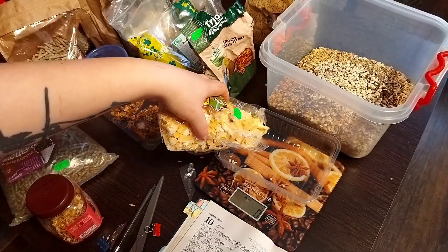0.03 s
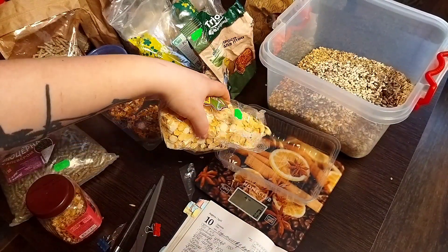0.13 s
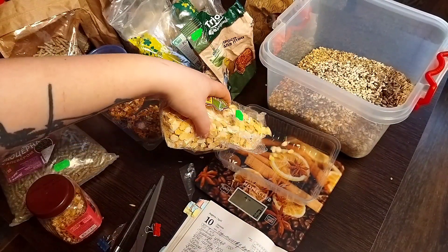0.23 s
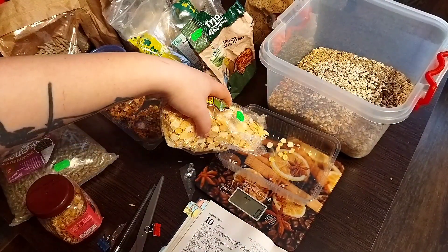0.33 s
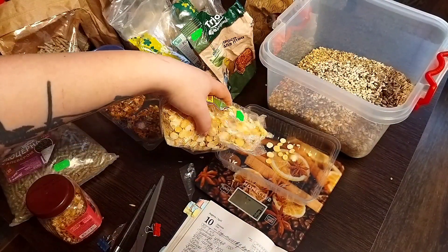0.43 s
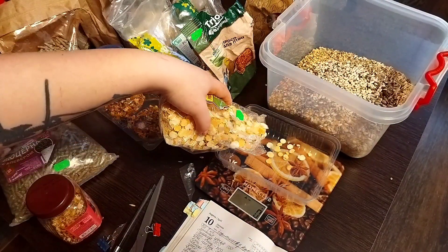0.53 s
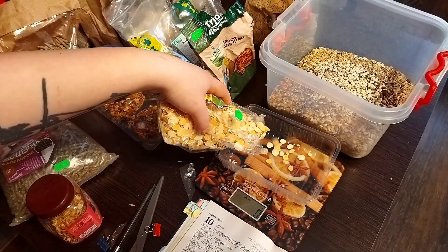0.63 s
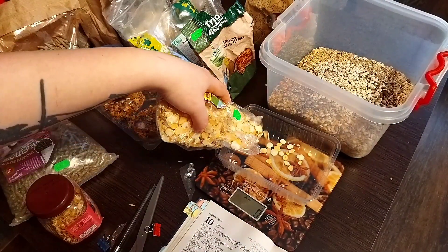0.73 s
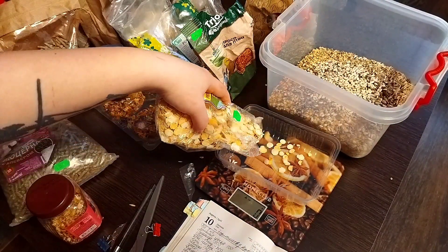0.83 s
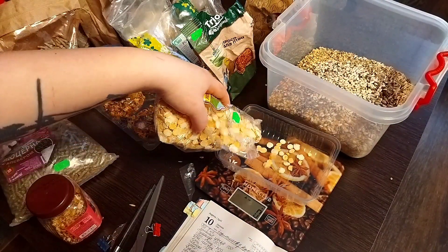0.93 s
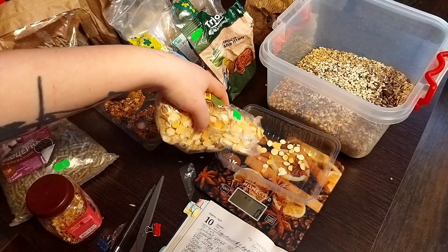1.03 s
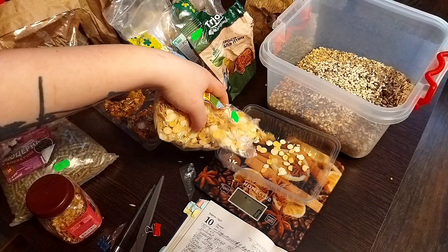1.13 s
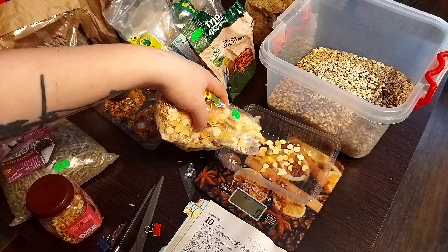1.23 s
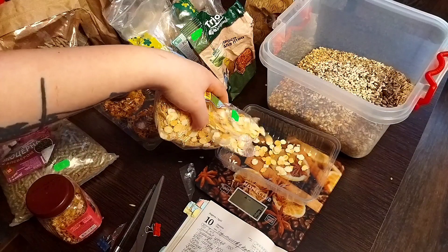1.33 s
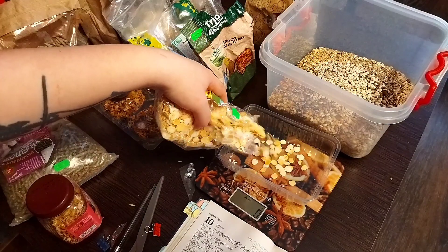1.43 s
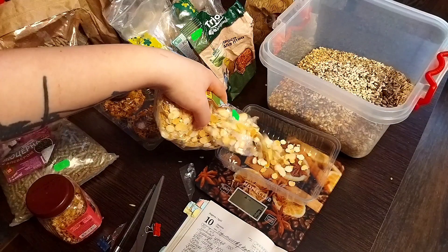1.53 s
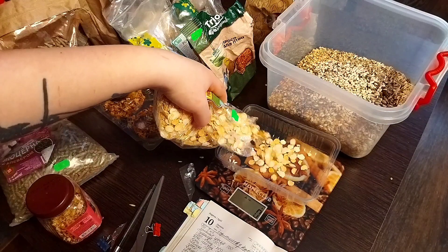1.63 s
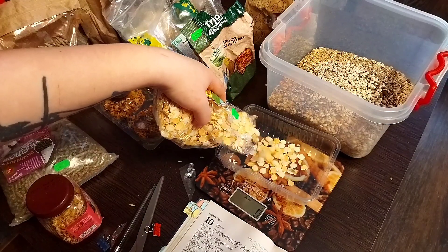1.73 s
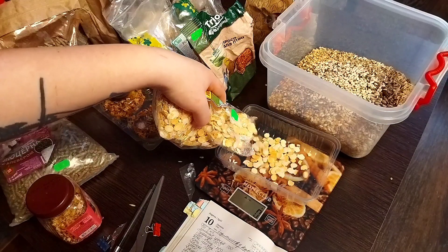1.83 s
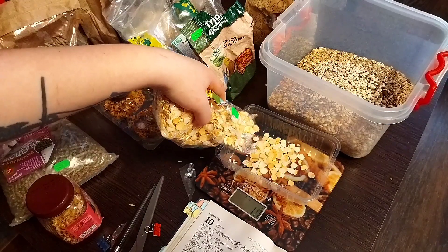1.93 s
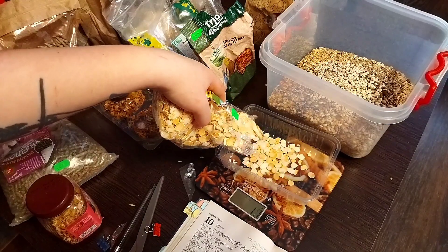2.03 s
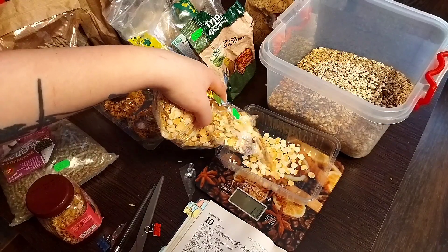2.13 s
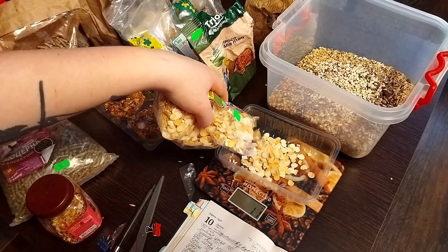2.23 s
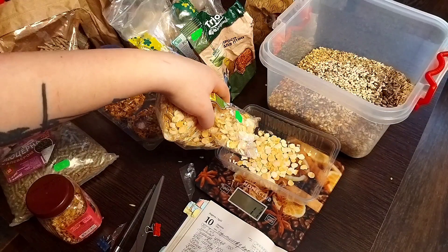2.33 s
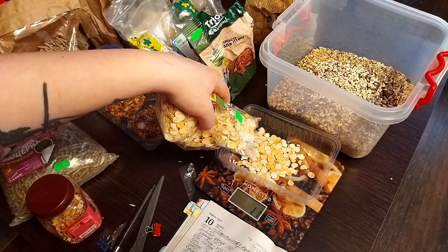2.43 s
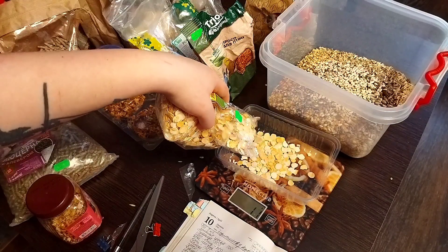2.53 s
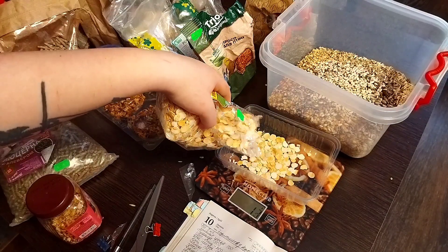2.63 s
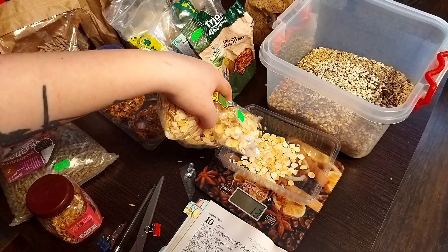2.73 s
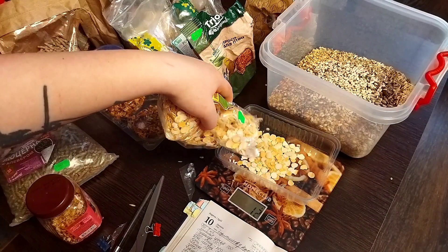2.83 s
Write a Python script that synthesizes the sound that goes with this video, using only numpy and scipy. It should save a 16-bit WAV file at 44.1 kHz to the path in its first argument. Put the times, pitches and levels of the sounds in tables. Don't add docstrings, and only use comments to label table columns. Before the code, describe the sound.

Dry flakes pour from a plastic bag into a thin plastic tray, starting with sharp separate ticks, thickening into crackling bursts, then thinning out; close stereo microphone in a quiet furnished room.

```python
import sys
import numpy as np
from scipy import signal
from scipy.fft import rfft, irfft
from scipy.io import wavfile

SR = 44100
rng = np.random.default_rng(int(sys.argv[2]) if len(sys.argv) > 2 else 0)


def transcribe(u):
    v = np.clip(np.atleast_2d(u).T, -1, 1)
    q = np.round(v * 32767).astype(np.int16)
    wavfile.write(sys.argv[1], SR, q)


def to_linear_factor(level_db):
    exponent = np.asarray(level_db, float) / 20
    return 10 ** exponent


N = 127890
LEFT_RIGHT = np.array([[1], [-1]])


def two_ports(mid, side, alike):
    return np.sqrt(1 + alike) * mid + np.sqrt(1 - alike) * side * LEFT_RIGHT


# pitch_hz [Hz], width_hz [Hz], level_db [dB], left_over_right_db [dB]
TRAY = [(310, 410, -22.5, 1), (486, 44, -16.5, 15), (784, 113, -5, -3.5), (1306, 440, -5, 1),
        (1649, 135, -3, 9.5), (2248, 550, 0.5, 2.8), (3310, 950, 1.16, 0.5), (4326, 746, 5, 0),
        (6400, 890, -1, -0.5), (8950, 1640, 0, 6), (11800, 2170, -3.5, -4), (14700, 1300, -15.5, 22)]
# pitch_hz [Hz], share [0-1]
TRAY_LIKENESS = [(350, .97), (700, .6), (4000, .7), (8000, .15)]
CRUNCH_S, CRUNCH_LONGER_LOW = 0.0005, 0.35
TICK_DB, TICK_S = 7, 0.00006
SINGLE_SCATTER_DB, SMALL_SCATTER_DB = 2, 5.5
SMALL_PEAK_HZ, SMALL_PEAK_OCTAVES, SMALL_PEAK_DB = 3830, 0.57, 3


def flakes():
    start_s, flake_db, tilt, small = landings()
    at = np.clip((start_s * SR).astype(int), 0, N - 1)
    scatter_db = np.where(small, SMALL_SCATTER_DB, SINGLE_SCATTER_DB)
    scatter = rng.standard_normal((len(at), len(TRAY)))
    white = rng.standard_normal((2, 2, N))
    out = np.zeros((2, N))
    for k, (hz, width_hz, level_db, pan_db) in enumerate(TRAY):
        octave = max(np.log2(hz / 3000), -1.9)
        peak = np.exp(-(np.log2(hz / SMALL_PEAK_HZ) / SMALL_PEAK_OCTAVES) ** 2)
        mode_db = level_db + small * SMALL_PEAK_DB * peak
        own_db = scatter_db * np.clip(scatter[:, k], -3, 1.4)
        power = np.bincount(at, to_linear_factor(2 * (flake_db + mode_db + tilt * octave + own_db)), N) + 1e-18

        tick = to_linear_factor(2 * TICK_DB) * signal.lfilter([1], [1, -np.exp(-1 / (TICK_S * SR))], power)
        tau = CRUNCH_S * (3000 / hz) ** CRUNCH_LONGER_LOW * SR
        decay = np.exp(-1 / tau)
        swell = signal.lfilter([np.e / tau], [1, -2 * decay, decay * decay], power)
        crunch = np.sqrt(tick + swell)

        alike = np.clip(np.interp(hz, *np.transpose(TRAY_LIKENESS)), 0, 1)
        mid, side = white[k % 2]
        drive = crunch * two_ports(mid, side, alike) * to_linear_factor(pan_db / 2 * LEFT_RIGHT)
        r = np.exp(-np.pi * width_hz / SR)
        feed = (1 - r * r) / 2 * np.array([1, 0, -1])
        out += signal.lfilter(feed, [1, -2 * r * np.cos(2 * np.pi * hz / SR), r * r], drive)
    return out


# [dB per octave, brightness]
SINGLES = [(0.157, -29.5, -1.5), (0.219, -9.5, -2.5), (0.232, -16.5, 0), (0.247, -11.5, -0.2),
           (0.263, -19, 2), (0.271, -9, 1.7), (0.276, -9, 1), (0.281, -5.5, -4), (0.284, -10, 3),
           (0.315, -6.5, -0.5), (0.336, -10, 2), (0.338, -10.5, -1), (0.354, -15, -0.5), (0.411, -16, 1),
           (0.425, -5.5, -3.5), (0.442, -11, 6), (0.513, -13.5, -2.1), (0.521, -19, 0), (0.552, -14, 2.7),
           (0.581, -19.5, 0), (0.627, -13, 0.5), (0.659, -15, -4.5), (0.682, -10.5, 1.5), (0.739, -17, 0.8),
           (0.777, -9, -3), (0.842, -18.5, 0.5), (0.858, -10.5, -1.5), (0.868, -17, 4.5), (0.884, -7.5, 3),
           (0.895, -8, 0.1),
           (0.952, -18, -1.5), (0.966, -8.5, -1), (1.003, -10.5, -3.5), (1.018, -8.5, 1), (1.023, -10, -4),
          (1.109, -17, 1.5), (1.243, -12, -0.8), (1.255, -9.5, -1.7), (1.279, -10, 0), (1.288, -7.5, 1),
          (1.295, -6, -0.5), (1.302, -5.5, -0.5), (1.344, -22, -5), (1.454, -9, -1.5), (1.489, -11, 5.5),
          (1.501, -14.5, -2.5), (1.549, -9.5, -1), (1.553, -16.5, 4.5), (1.565, -15, 0.5),
          (1.582, -11.5, -1.5), (1.614, -13.5, 1.5), (1.618, -22, 2.5), (1.656, -7, -1.5), (1.703, -7, -2),
          (1.711, -11, -1.5), (1.744, -10, -1), (1.765, -22, 2.5),
           (1.909, -12.5, -0.8), (1.918, -25, 4), (1.943, -12.5, -2), (1.966, -28, 8), (2.026, -8.5, -1.5),
        (2.067, -12, 2), (2.098, -27, 3), (2.115, -10.5, -2.5), (2.124, -16.5, 2.5), (2.169, -21, -0.5),
        (2.229, -14, -0.5), (2.314, -16, 2.5), (2.365, -14.5, 2), (2.37, -10, -4), (2.503, -24.5, 2.5),
        (2.515, -14.5, 0), (2.602, -22, 3), (2.606, -15.5, 0.7), (2.708, -23, -4.5), (2.733, -20, 0.5),
        (2.795, -29.5, 5), (2.866, -24.5, 4.5),
           (0.293, -16.5, -4), (0.329, -12, -2), (0.372, -20.5, 2), (0.388, -24, -2), (0.432, -21, 0.4),
        (0.449, -15.5, -3), (0.503, -22, -3), (0.518, -19.5, -3.5), (0.532, -23, -5), (0.549, -20, 2.5),
        (0.632, -22, 2), (0.663, -20, 5), (0.748, -17.5, 0), (0.759, -20.5, 2.7), (0.813, -30, -2),
        (0.999, -15.5, 2.7), (1.051, -30, 5), (1.1, -27, -7), (1.144, -22.5, 0.5), (1.173, -24.5, 1.5),
        (1.216, -27, -3), (1.269, -23, 2), (1.313, -20, -2), (1.323, -13, -2), (1.332, -19, 4),
        (1.336, -12, -3), (1.364, -18, -2), (1.384, -18.5, -5.5), (1.462, -21.5, -3), (1.495, -14, 0),
        (1.509, -16, -5), (1.521, -18, -2), (1.561, -20, 2), (1.608, -16, 0), (1.638, -13.5, -3.5),
        (1.646, -22, 6), (1.65, -15, 3), (1.661, -15.5, 4), (1.667, -18, 4), (1.675, -12, -2),
        (1.682, -27, 2.7), (1.689, -16, 4.0), (1.722, -18, 1.0), (1.782, -31, 3), (1.793, -17.5, -2.5),
        (1.808, -18, -3), (1.818, -23, 3), (1.866, -22, 4), (1.936, -20, 4.5), (1.991, -19.5, -4),
        (2.018, -21, -1), (2.181, -28, -2), (2.21, -42, -7), (2.238, -20.5, 3.5), (2.241, -21, 6.5),
        (2.27, -20, 3.5), (2.302, -18, -2), (2.353, -29, 5), (2.416, -22.5, 1), (2.486, -31, 1)]
FLAKE_DB, FLIGHT_S = -8, 0.001
REBOUND_S, REBOUND_DB, REBOUND_DULLER_DB = 0.0025, -11, 2.5
SMALL_PER_S, SMALL_DB, SMALL_TILT_DB = 1540, -14.5, 0.15
SIZE_SPREAD_DB, SIZE_CAP = 3.5, 2.88


def landings():
    s, db, tilt = np.transpose(SINGLES)
    s = np.r_[s, s + REBOUND_S] + FLIGHT_S
    db = np.r_[db, db + REBOUND_DB] + FLAKE_DB
    tilt = np.r_[tilt, tilt - REBOUND_DULLER_DB]

    when, chance, size, hue = rng.random((4, 9000))
    when *= N / SR
    size_db = SIZE_SPREAD_DB * np.minimum(-np.log(size + 1e-9), SIZE_CAP) + SMALL_DB
    unused = chance > SMALL_PER_S * N / SR / len(when)
    small_db = np.interp(when, *flow_db()) + size_db - 200 * unused
    small_tilt = SMALL_TILT_DB + 3 * (hue - 0.5)
    small = np.arange(len(s) + len(when)) >= len(s)
    return np.r_[s, when], np.r_[db, small_db], np.r_[tilt, small_tilt], small


# start_s [s], hold_s [s], level_db [dB]
SHOWERS = [(0.265, 0.013, -25), (0.332, 0.0053, -26.5), (0.485, 0.028, -40), (0.653, 0.027, -31),
           (0.885, 0.01, -24), (1.012, 0.0077, -29), (1.1, 0.013, -30), (1.235, 0.0064, -35),
           (1.289, 0.049, -22.5), (1.45, .008, -31), (1.373, 0.015, -31), (1.481, 0.021, -27),
           (1.552, 0.018, -24.5), (1.619, 0.051, -23.5), (1.738, 0.017, -30), (1.791, 0.029, -28),
           (1.851, 0.021, -31), (1.93, 0.056, -33.5), (2.018, 0.009, -35.5), (2.022, 0.0069, -33),
           (2.231, 0.078, -27.5), (2.332, 0.076, -31.5), (2.634, 0.014, -38), (2.698, 0.0066, -38)]
# time_s [s], level_db [dB]
TRICKLE = [(0.0, -48.5), (0.26, -54.5), (0.39, -34), (0.73, -44.5), (0.9, -39), (1.05, -38), (1.32, -45.5),
           (1.46, -40), (1.7, -28), (1.91, -34.5), (2.06, -39), (2.17, -40), (2.72, -47), (2.9, -46.5)]
SHOWER_RISE_S, SHOWER_FALL_DB_PER_S = 0.00099, 379


def flow_db():
    t = np.arange(0, N, 32) / SR
    power = to_linear_factor(2 * np.interp(t, *np.transpose(TRICKLE)))
    for start_s, hold_s, level_db in SHOWERS:
        rise = np.clip((t - start_s) / SHOWER_RISE_S, 0, 1)
        fall_db = SHOWER_FALL_DB_PER_S * np.maximum(t - start_s - hold_s, 0)
        power = power + rise * to_linear_factor(2 * (level_db - fall_db))
    return t, 10 * np.log10(power)


# start_s [s], level_db [dB], pitch_hz [Hz], t60_s [s]
KNOCKS = [(0.282, -44, 467, 0.016), (.284, -15, 1470, 0.015), (.338, -19, 1380, 0.014),
          (0.221, -12, 4600, 0.0075), (.425, -13, 1310, 0.013), (0.49, -19.5, 265, 0.013),
          (0.885, -27, 128, 0.048), (.967, -10.5, 6140, 0.0063), (2.609, -20, 4500, 0.012),
          (2.115, -22, 1910, 0.012), (.777, -13, 1275, 0.012), (1.025, -50, 760, 0.023),
          (1.412, -23, 262, 0.013), (1.566, -32, 310, 0.038), (1.655, -49, 760, 0.022),
          (2.026, -37, 715, 0.048), (2.516, -29.5, 915, 0.015), (2.773, -37, 310, 0.039)]
KNOCK_RISE_CYCLES = 0.69


def knocks():
    out = np.zeros(N + SR)
    t = np.arange(SR // 4) / SR
    for start_s, level_db, hz, t60_s in KNOCKS:
        i = int(start_s * SR)
        rise = 1 - np.exp(-t * hz / KNOCK_RISE_CYCLES)
        out[i:i + len(t)] += to_linear_factor(level_db - 60 * t / t60_s) * np.sin(2 * np.pi * hz * t) * rise
    return out[:N]


ROOM_DB, ROOM_LOW_HZ, ROOM_GAP_S = -6, 480, 0.00062
ROOM_T60_S, ROOM_HIGH_T60_S, WALL_CUT_HZ = 0.42, 0.14, 2060
ROOM_ALIKE_HZ = 710


def room(x):
    x = signal.lfilter(*signal.butter(2, ROOM_LOW_HZ, "high", fs=SR), x)
    t = np.arange(SR // 2) / SR
    noise = rng.standard_normal((2, len(t)))
    noise[1] += signal.lfilter(*signal.butter(2, ROOM_ALIKE_HZ, fs=SR), noise[0] - noise[1])
    low = signal.lfilter(*signal.butter(1, WALL_CUT_HZ, fs=SR), noise)
    tail = low * to_linear_factor(-60 * t / ROOM_T60_S) + (noise - low) * to_linear_factor(-60 * t / ROOM_HIGH_T60_S)
    tail = tail * np.clip(t / ROOM_GAP_S - 1, 0, 1)
    tail = tail / np.sqrt(np.sum(tail ** 2) / 2)
    return to_linear_factor(ROOM_DB) * signal.fftconvolve(x[None], tail)[:, :N]


# pitch_hz [Hz], level_db [dB per Hz]
HUSH = [(15, -61), (50, -5), (130, 1), (263, 5.5), (887, 7), (1100, 7), (2690, 5), (7310, -67),
        (9070, -5.5), (16000, -1.5)]
# pitch_hz [Hz], share [0-1]
HUSH_LIKENESS = [(120, 0.2), (290, 0.86), (1400, 0.24), (6000, 0.5)]
HUSH_DB = -51


def hush():
    hz = np.arange(N // 2 + 1) * SR / N + 1
    f, db = np.transpose(HUSH)
    colour = to_linear_factor(np.interp(np.log(hz), np.log(f), db))
    mid, side = rfft(rng.standard_normal((2, N))) * colour
    alike = np.clip(np.interp(hz, *np.transpose(HUSH_LIKENESS)), 0, 1)
    x = irfft(two_ports(mid, side, alike), N)
    return to_linear_factor(HUSH_DB) * x / x.std()


MIC_LOW_HZ, LEFT_LAG_S, LEFT_DB = 268, 0.00005, -0.5


def scene():
    low_cut = signal.butter(3, MIC_LOW_HZ, "high", fs=SR, output="sos")
    near = signal.sosfilt(low_cut, flakes() + knocks())
    hz = np.arange(N // 2 + 1) * SR / N
    lag = np.exp(-2j * np.pi * hz * LEFT_LAG_S)
    left = irfft(rfft(near[0]) * lag, N) * to_linear_factor(LEFT_DB)
    return np.array([left, near[1]]) + room(near.mean(axis=0)) + hush()


def band_limit(x):
    return signal.sosfilt(signal.butter(12, 16970, fs=SR, output="sos"), x)


CUTOFF_HZ, TOP = 16050, 0.95


def record(dry):
    limited = TOP * np.tanh(dry / TOP)
    finished = signal.sosfilt(signal.cheby2(10, 38, CUTOFF_HZ, fs=SR, output="sos"), limited)
    return band_limit(finished)


dry = scene()
out = record(dry)
transcribe(out)
```